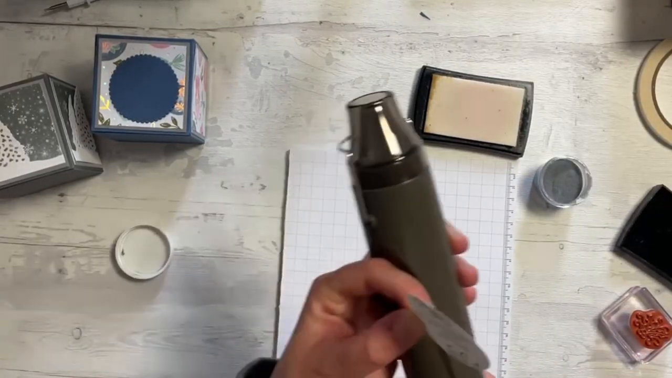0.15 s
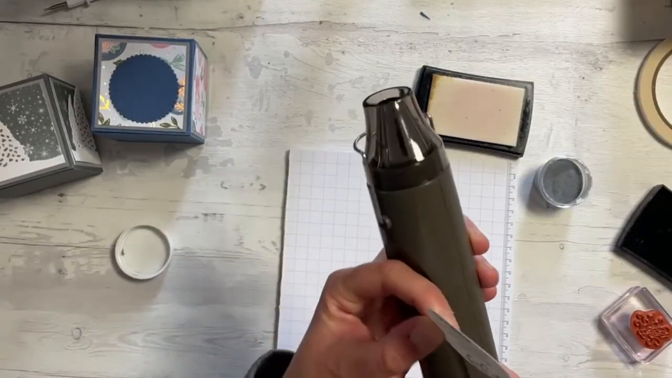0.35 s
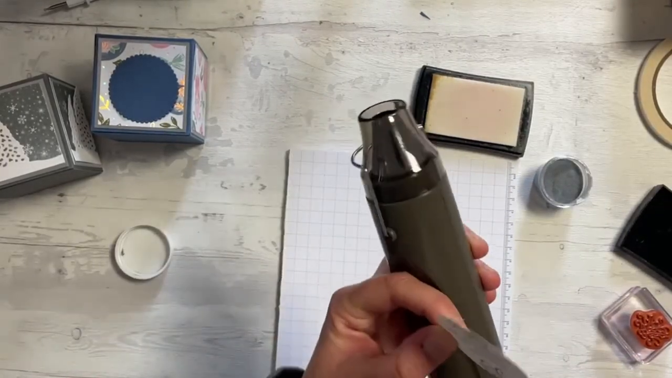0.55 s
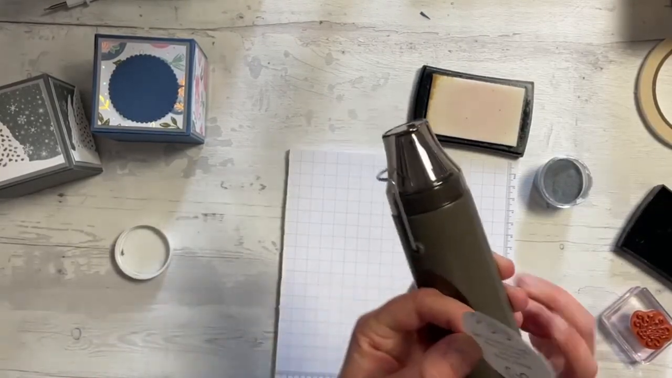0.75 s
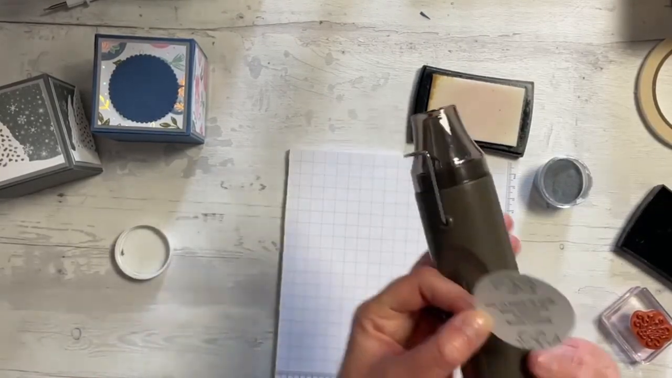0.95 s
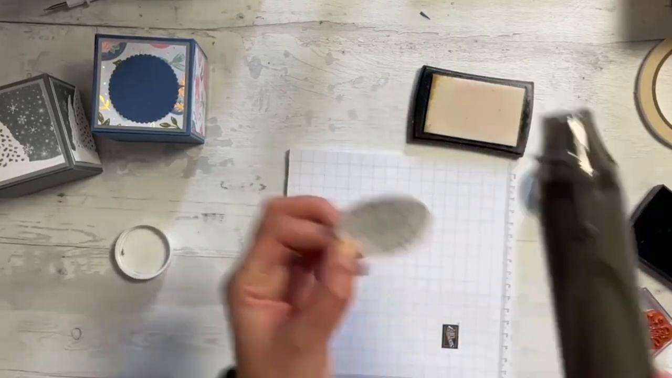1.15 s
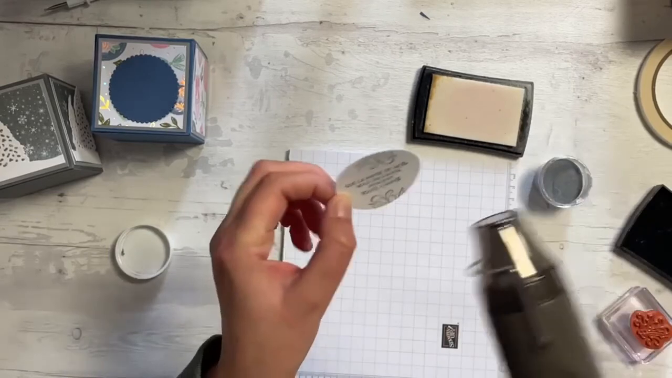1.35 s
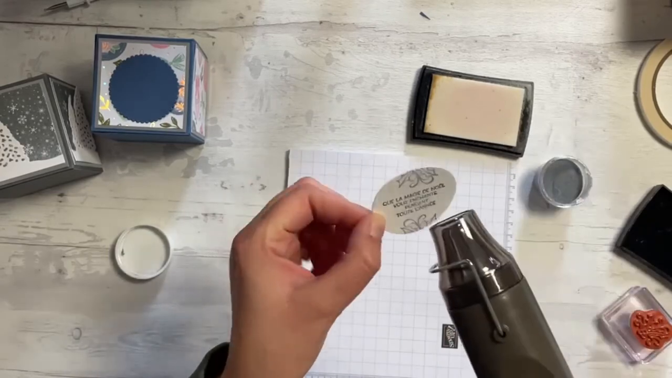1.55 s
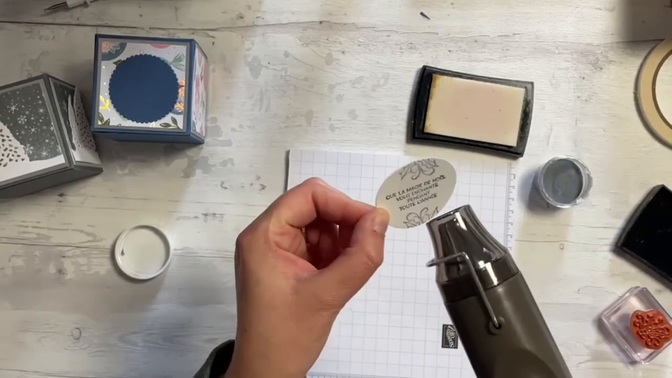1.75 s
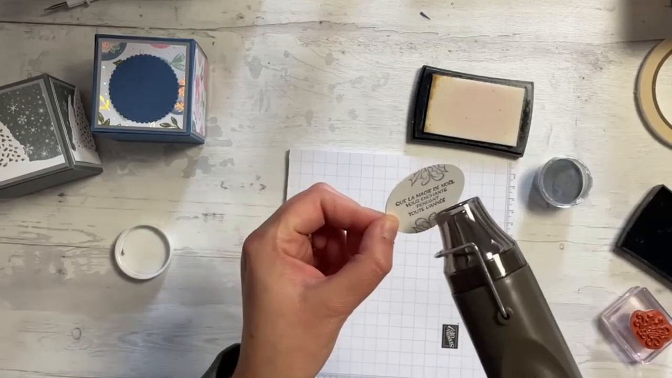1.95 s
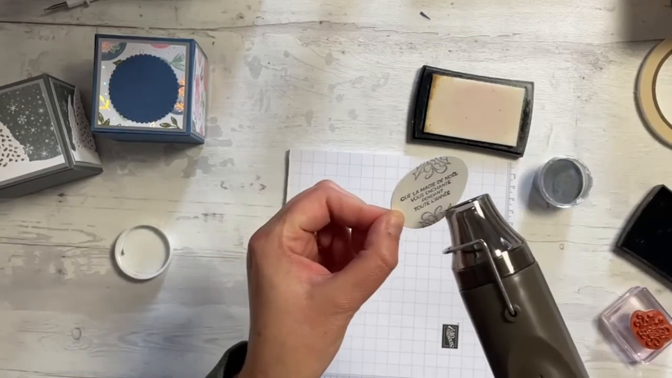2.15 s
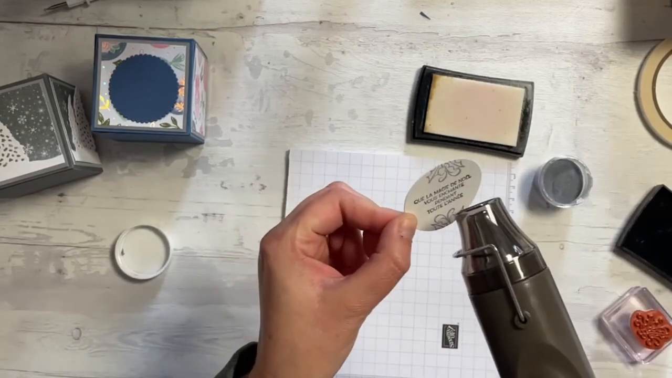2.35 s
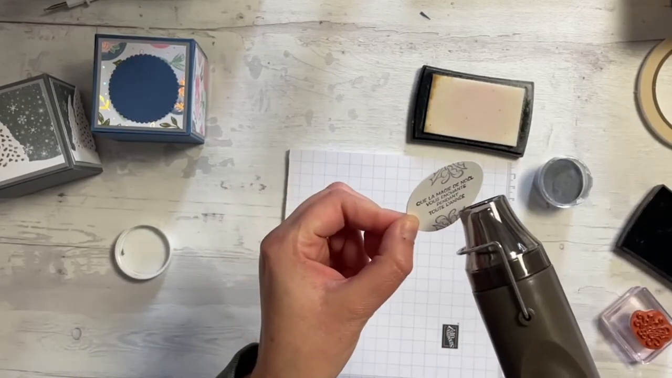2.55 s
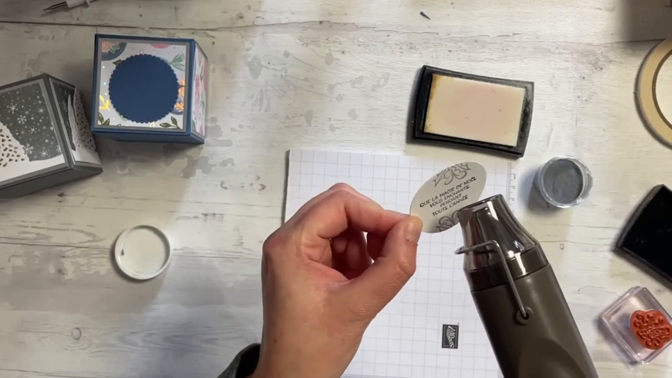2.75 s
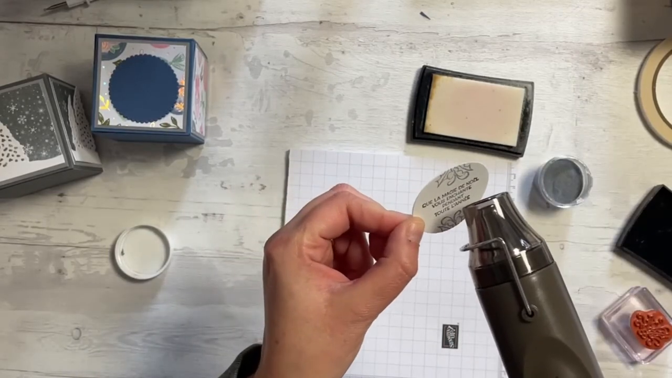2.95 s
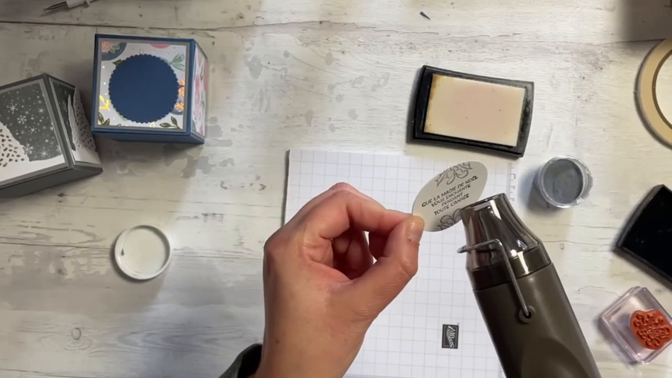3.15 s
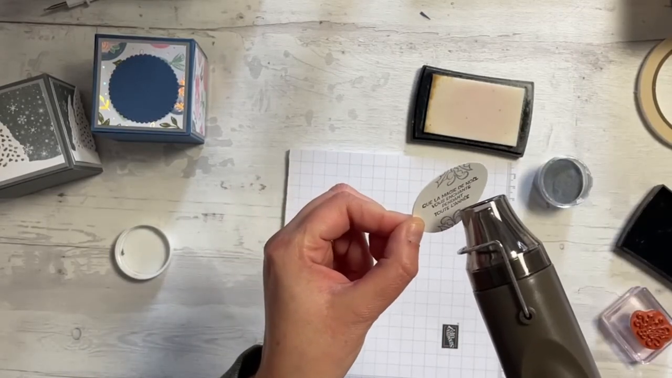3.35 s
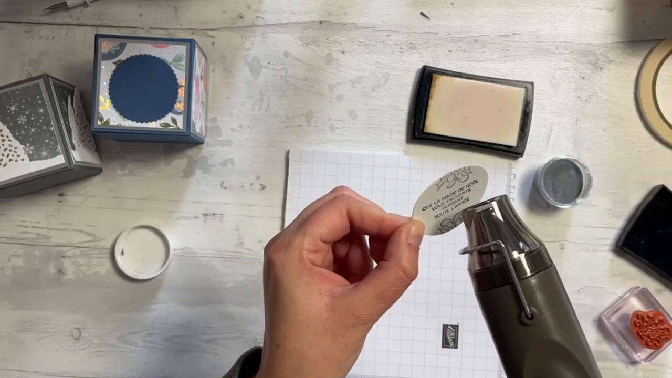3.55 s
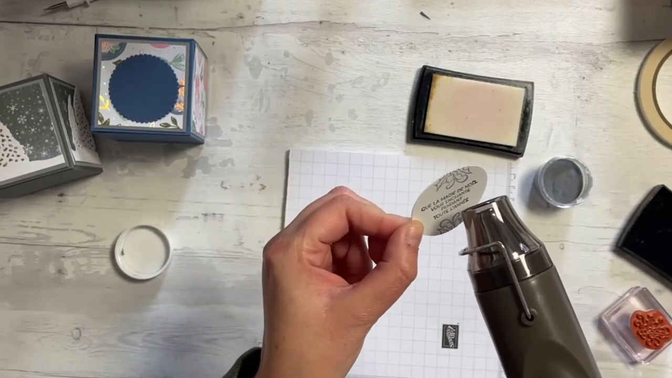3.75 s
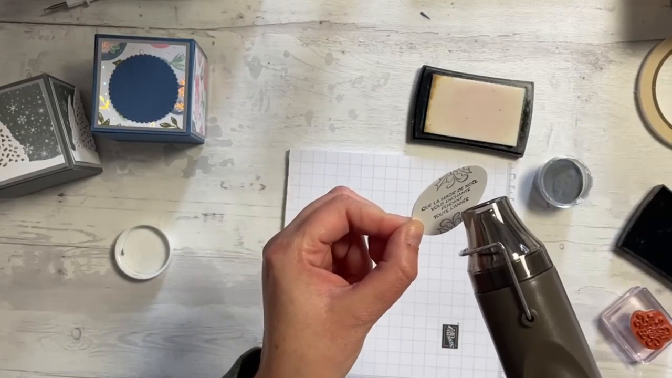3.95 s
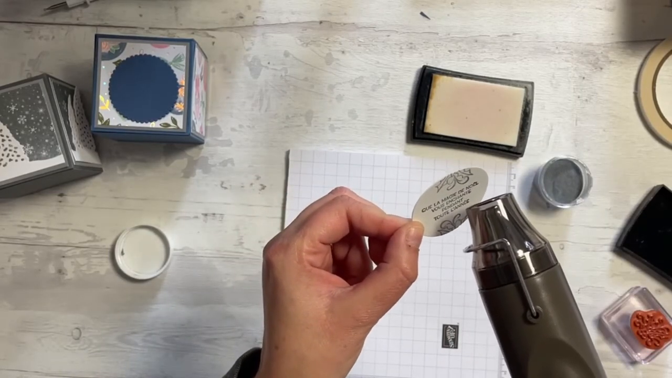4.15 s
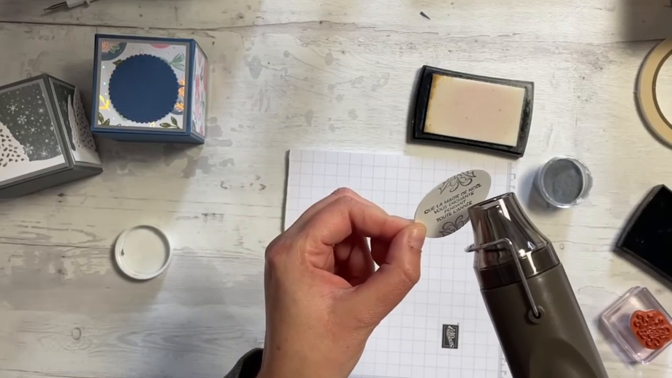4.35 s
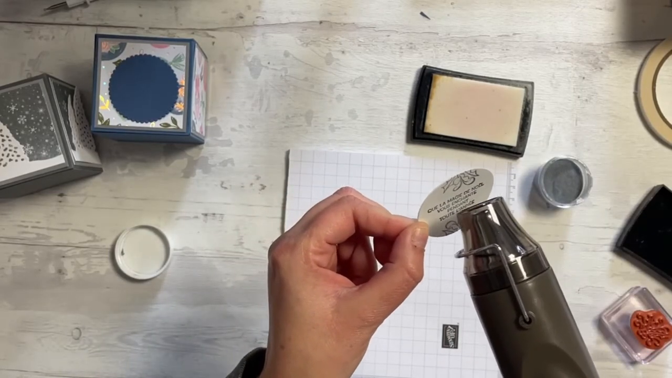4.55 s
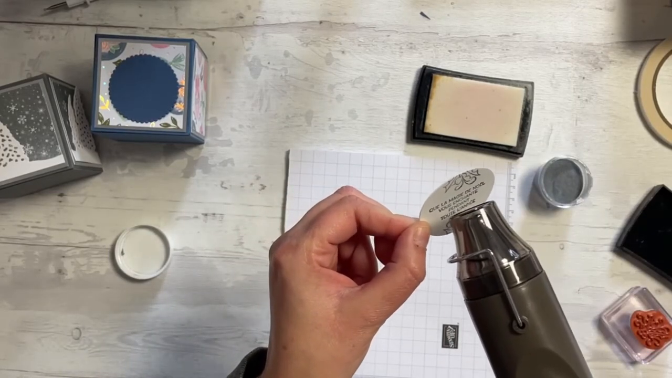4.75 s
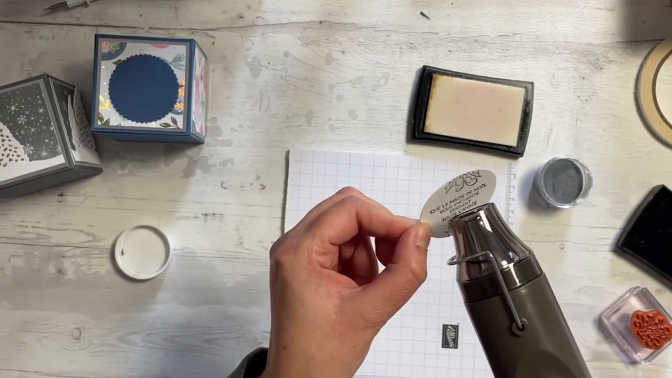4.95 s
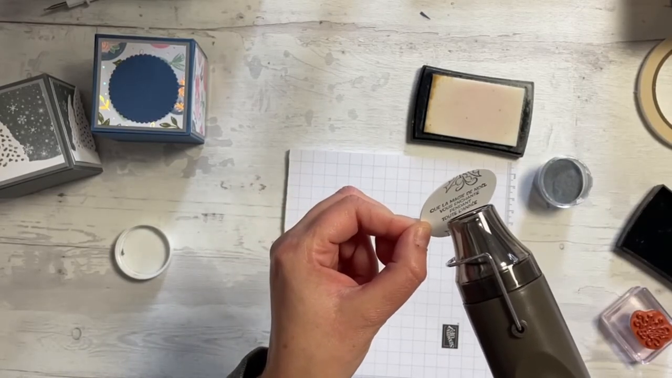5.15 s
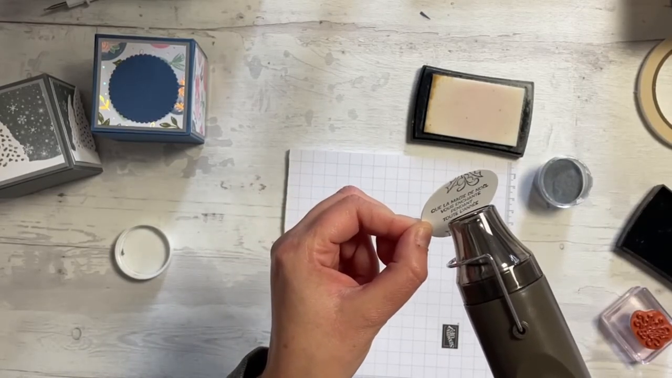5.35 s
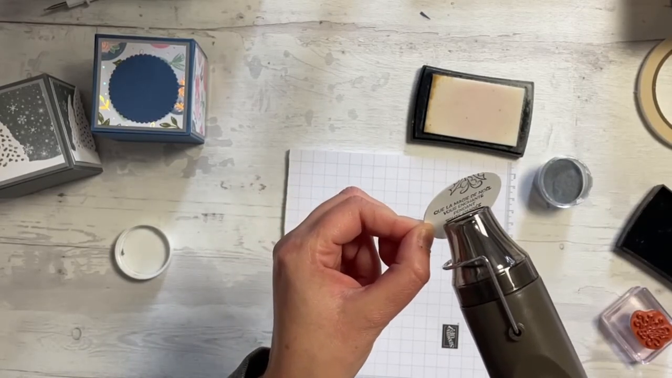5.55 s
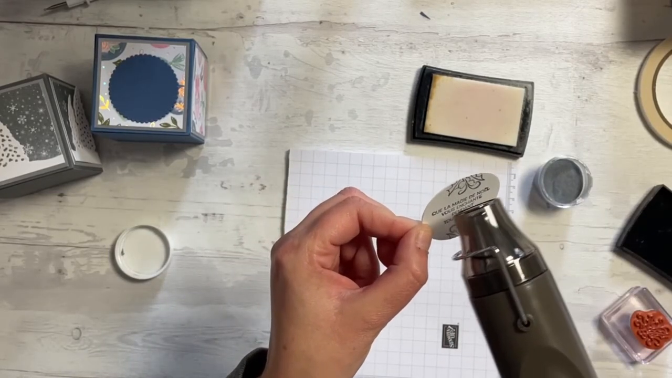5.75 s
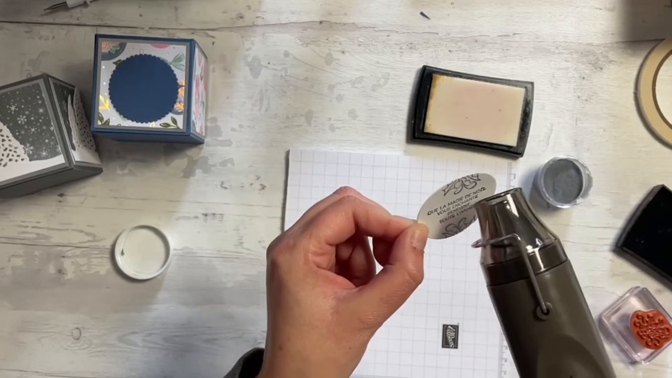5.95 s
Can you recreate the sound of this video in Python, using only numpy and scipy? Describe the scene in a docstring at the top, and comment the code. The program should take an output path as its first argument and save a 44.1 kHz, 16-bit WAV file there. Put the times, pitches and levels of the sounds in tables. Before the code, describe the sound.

A small, fairly dry room, heard close above a desk. The first 0.3 s is nearly silent, with a very faint rustle dying away at once. A soft tick comes at 0.3 s, then a bright, hard double plastic snap at 0.4 s with a short room reflection. A small heat gun motor immediately sweeps up in pitch, churning air, and settles near full speed by about 1 s. A low thump bumps the microphone at 0.7 s. The tones dip briefly around 1.15 s as the gun swings aside. Until 3.1 s it is loud: a broad airy rush with hiss, a strong fan whine, thin high tones and brush buzz, gently wavering. At 3.1 s the level drops abruptly, one high tone lingering briefly. The quieter whir holds, pitch dipping slightly then creeping up, with soft thumps near 5.0 and 5.6 s, still running at 6 s.

```python
"""In a small room, above a desk, a craft heat gun is switched on.
The switch ticks and snaps as short bursts of coloured noise with room reflections. The motor runs up to about
250 turns a second: its shaft angle drives a five-bladed fan's whine and a brush buzz over a rush of shaped noise.
The strongest tones swell and fade in the room as the speed wanders. Now and then low puffs and thumps of
air buffet the microphone. Halfway through, the gun's sound abruptly steps down."""
import sys
import numpy as np
from scipy import signal
from scipy.fft import rfft, irfft
from scipy.io import wavfile

SR = 44100
rng = np.random.default_rng(int(sys.argv[2]) if len(sys.argv) > 2 else 0)


def log_audio(samples):
    """Write samples as a 16-bit WAV file to the path given in sys.argv[1]."""
    # one column per channel
    frames = np.atleast_2d(samples).T
    # limit to full scale, then quantise
    limited = np.clip(frames, -1, 1)
    pcm = np.round(limited * 32767).astype(np.int16)
    wavfile.write(sys.argv[1], SR, pcm)


N = 269010
TIME = np.arange(N) / SR
FREQS = np.maximum(np.fft.rfftfreq(N, 1 / SR), 1)  # Hz, kept above 0 for the logarithms

# relative colour of the quiet room: pitch_hz, density_db (per Hz)
QUIET_COLOUR = [(35, -60), (60, -30), (120, -8), (207, -4), (324, -1), (363, -5), (465, -4.5), (1880, -8.5),
                (6330, -4), (13000, -15)]
# relative colour of the air puffs: pitch_hz, density_db (per Hz)
PUFF_COLOUR = [(25, -38), (55, -9), (90, 9), (140, 1), (200, -12), (400, -32), (1000, -70)]
# air puffs on the microphone: start_s (centre of the swell), level_db (before the low cut), half_length_s
AIR_PUFFS = [(0.741, -46, 0.022), (0.83, -78, 0.072), (1.917, -64, 0.025), (2.037, -67, 0.018),
             (2.54, -68, 0.026), (2.822, -71, 0.054), (4.78, -79, 0.063), (5.12, -62, 0.041),
             (5.28, -70, 0.054), (5.54, -64, 0.059), (5.653, -61, .025), (5.916, -68, 0.02)]
# sharp puffs that land as soft thumps: start_s, peak_db (of the swell), ring_hz
SOFT_THUMPS = [(0.708, -41, 126), (5.003, -43.5, 133), (5.527, -46, 140), (5.603, -39, 119),
               (5.632, -43, 130)]
# relative colour of the switch, before each contact's tilt: pitch_hz, density_db (per Hz)
SNAP_COLOUR = [(100, -52), (315, -27), (730, -22), (1150, -11), (1900, -1.5), (2800, -2), (4500, -0.5),
               (6800, -5), (8400, -3), (11400, -14.5), (13400, -34)]
# switch contacts: start_s, level_db (before envelope and low cut), decay_s, tilt_db (per octave), low_cut_hz
SWITCH_CONTACTS = [(0.309, -30.5, 0.0041, -6.5, 1120), (0.3968, -12, 0.0027, 1.5, 302),
                   (0.4075, -18, 0.0018, -4.5, 300)]
# the speed the motor heads for, wandering by about one percent: time_s, speed_turns_per_s
TOP_SPEED_CURVE = [(1, 246.6), (1.5, 248.15), (2.3, 248.8), (2.75, 249.45), (3.05, 249.55), (3.4, 249.2),
                   (3.75, 247.95), (4.5, 247.93), (4.75, 248.25), (5, 249.25), (5.75, 250.6), (6.08, 251)]
# relative broad colour of the rushing air: pitch_hz, density_db (per Hz)
AIR_COLOUR = [(60.0, -30), (150.0, -11.5), (200.0, -5.5), (470.0, -5.0), (540.0, 0), (1000.0, -2.7),
              (2900.0, 1.5), (3900.0, -13), (4800.0, -6), (6400.0, -13.5), (7400.0, -8), (10200.0, -16.5),
              (11500.0, -21.5), (12800.0, -40)]
# peaks and hollows that housing and desk add to that colour: pitch_hz, width_hz, gain_db
HOUSING_RESONANCES = [(234, 17, 5.5), (281, 8.9, 6), (522.3, 7.3, 14), (571, 23.3, 6.5), (654.3, 50, 14.5),
                      (789, 36, 11.5), (862.6, 13.5, 9.5), (927, 7.4, 14.5), (991, 12.3, 11.5),
                      (1119, 65, 7.5), (1282, 27, 7), (1357, 24, 6.5), (1484, 32, 7.5), (1650, 34, 7),
                      (1738, 24, 10), (1848, 29.7, 10.5), (1894, 11.5, 10), (1963, 52, 10), (2180, 30, -6),
                      (2304, 15, -12), (2200, 31, 0), (2606, 79, 8), (2785, 20, 6), (3463, 29, 6.5),
                      (5530, 73, 0), (8200, 170, -1.5), (8980, 46, 7)]
# loudness of the air while the gun is swung round and then held still: time_s, rush_db, hiss_db
AIM_CURVE = [(.8, 1.0, 1.5), (1.5, -.4, 1.5), (1.8, 0.6, -0.2), (2.3, -0.4, 0.0), (4.2, -0.3, -.5),
             (6, -0.7, 0.0)]
# extra tilt of the brush buzz, which is brighter than the air: pitch_hz, gain_db
BRUSH_COLOUR = [(4000, -8), (8000, -4), (12500, -14)]
# steady motor partials: multiple (of the turning rate), level_db (rms relative to the whine's own level)
SHAFT_PARTIALS = [(1, -51.5), (3, -48), (7, -47), (10, -45.5), (15, -57.5), (19, -53), (21, -60.5),
                  (22, -71), (25, -46.5), (27, -74), (28, -57), (29, -49), (31, -54), (32, -69), (37, -66),
                  (39, -67), (41, -54), (42, -70), (44, -60), (45, -58.5), (48, -68), (50, -75)]
# tones that swell and fade as the speed slides them across the room's peaks and nulls:
# multiple (of the turning rate), onset_turns_per_s, level_db (rms before the gains in standing_tones),
# trend_db_per_s (about mid-scene), loudest_at_turns_per_s (above full speed),
# spacing_turns_per_s (between peaks), reflected_share (0-1)
ROOM_TONES = [(5, 109.4, -44.5, -1.0, -0.39, 2.22, 0.72), (20, 231, -45, -0.9, 0.53, 3.8, 0.44),
              (30, 242, -47, -3.2, -0.3, 1.5, .44), (35, 252, -54, 3.9, 1.6, 3.5, 0),
              (36, 242, -54, -4, -1.4, 3.5, .31), (40, 249, -51, -2.5, -0.33, 2.9, 0.7)]

# quiet room, with a faint rustle dying away at first: levels in dB, fall in dB per s
QUIET_DB, RUSTLE_DB, RUSTLE_FALL_DB_PER_S = -77, -66.5, 138
# motor and fan; FULL_SPEED, in turns per s, is the reference for every speed ratio
START_S, RUN_UP_S, FULL_SPEED, BLADES = .36, .262, 249, 5
# base level of the rush, before aim, flutter and run-up
AIR_DB = -32.5
# early in the run-up the blade tone sweeps through the resonance of the nozzle
NOZZLE_HZ, NOZZLE_WIDTH_HZ, NOZZLE_DB = 620, 170, 6.5
# the gun is swung aside once and its strongest tones point away from the microphone
SWING_S, SWING_HALF_LENGTH_S, SWING_DB = 1.165, 0.07, -10
# the sound steps down, the bass a little less; the 5 kHz tone falls more slowly
STEP_S, STEP_FALL_S, BASS_STEP_DB, UPPER_STEP_DB = 3.098, .01, -10.5, -11
LINGERING_MULTIPLE, LINGER_S = 20, 0.22
CUTOFF_HZ = 13200


def from_db(db):
    """Decibels to gain."""
    return 10 ** (np.asarray(db) / 20)


def rms_one(x):
    """Scale to unit power."""
    return x / np.sqrt(np.mean(x ** 2) + 1e-20)


def in_time(rows):
    """Each column of a curve at every sample."""
    s, *columns = np.transpose(rows)
    return [np.interp(TIME, s, c) for c in columns]


def colour(points):
    """A short spectrum in dB, drawn out to every frequency on a log pitch scale."""
    hz, db = np.transpose(points)
    return np.interp(np.log(FREQS), np.log(hz), db)


def noise(spectrum_db):
    """Unit-power noise of the given colour."""
    spectrum = rfft(rng.standard_normal(N)) * from_db(spectrum_db)
    return rms_one(irfft(spectrum, N))


def drift(rate_hz):
    """Slow random wandering of spread 1, drawn at every 50th sample."""
    count = N // 50 + 2
    hz = np.fft.rfftfreq(count, 50 / SR)
    spectrum = rfft(rng.standard_normal(count)) / (1 + (hz / rate_hz) ** 2)
    slow = rms_one(irfft(spectrum, count))
    return np.interp(np.arange(N) / 50, np.arange(count), slow)


def butter(x, hz, kind, order=2):
    """Causal low- or high-pass."""
    return signal.sosfilt(signal.butter(order, hz, kind, fs=SR, output="sos"), x)


def quiet_room():
    """The room's own faint noise and the end of a rustle."""
    level = from_db(QUIET_DB) + from_db(RUSTLE_DB - RUSTLE_FALL_DB_PER_S * TIME)
    return level * noise(colour(QUIET_COLOUR))


def puffs(low_cut_hz=50):
    """Short swells of low rumble where the air stream meets the microphone."""
    swell = np.zeros(N)
    for start_s, level_db, half_length_s in AIR_PUFFS:
        swell += from_db(level_db) * np.exp(-.5 * ((TIME - start_s) / half_length_s) ** 2)
    return butter(swell * noise(colour(PUFF_COLOUR)), low_cut_hz, "high")


def thumps(swell_s=0.0067):
    """A sharp puff shakes the microphone for two or three low cycles."""
    out = np.zeros(N)
    for start_s, peak_db, ring_hz in SOFT_THUMPS:
        age = np.maximum(TIME - start_s, 0)
        swell = (age / swell_s * np.exp(1 - age / swell_s)) ** 3
        out += from_db(peak_db) * swell * np.sin(2 * np.pi * ring_hz * age)
    return out


def switch(rise_s=0.0011, pivot_hz=4000):
    """Each contact is a brief crack of the plastic shell, which is too small to radiate bass."""
    out = np.zeros(N)
    for start_s, level_db, decay_s, tilt_db, low_cut_hz in SWITCH_CONTACTS:
        age = np.maximum(TIME - start_s, 0)
        blow = (1 - np.exp(-(age / rise_s) ** 2)) * np.exp(-age / decay_s)
        crack = blow * noise(colour(SNAP_COLOUR) + tilt_db * np.log2(FREQS / pivot_hz))
        out += from_db(level_db) * butter(crack, low_cut_hz, "high", order=4)
    return out


def room(x, wet_db=-4.5, low_t60_s=0.24, high_t60_s=0.21, split_hz=3500, first_s=0.0053):
    """Dense reflections from desk and walls; the treble dies first."""
    scatter = rng.standard_normal(N) * (TIME > first_s)
    tail = butter(scatter, split_hz, "low", order=3) * from_db(-60 * TIME / low_t60_s)
    tail += butter(scatter, split_hz, "high", order=3) * from_db(-60 * TIME / high_t60_s)
    tail = tail / np.linalg.norm(tail)
    return x + from_db(wet_db) * signal.fftconvolve(x, tail)[:N]


def motor_speed(wobble=0.00034):
    """Turns per second: a quick rise that levels off as drag catches up with the motor."""
    since_start = np.maximum(TIME - START_S, 1 / SR)  # never quite still, so ratios stay above 0
    run_up = np.tanh(since_start / RUN_UP_S)
    return in_time(TOP_SPEED_CURVE)[0] * run_up * (1 + wobble * drift(5.4))


def build_up(speed, onset, sharpness, growth):
    """Gain of a sound that breaks out around an onset speed, then grows as a power of the speed."""
    opened = (1 + np.tanh(sharpness / 2 * np.log(speed / onset))) / 2
    return np.sqrt(opened) * (speed / FULL_SPEED) ** growth


def housing():
    """Gain in dB at every frequency for sound made inside the gun."""
    gain_db = colour(AIR_COLOUR)
    for hz, width_hz, db in HOUSING_RESONANCES:
        gain_db = gain_db + db * np.exp(-.5 * ((FREQS - hz) / width_hz) ** 2)
    return gain_db


def rush(angle, speed, bass_hz=380, split_hz=3400, low_cut_hz=95, bass_growth=1.5, flutter_db=.5):
    """Turbulence sounds through the housing; bass and hiss need more speed, and the hiss pulses once a turn."""
    air = butter(noise(housing()), low_cut_hz, "high", order=3)
    rush_db, hiss_db = in_time(AIM_CURVE)
    body = butter(air, split_hz, "low", order=7)
    bass = butter(body, bass_hz, "low", order=3) * (speed / FULL_SPEED) ** bass_growth
    body = butter(body, bass_hz, "high", order=3) + bass
    body = body * from_db(rush_db) * build_up(speed, onset=176, sharpness=7.8, growth=2.43)
    pulsing = 1 + .35 * np.cos(angle)
    hiss = butter(air, split_hz, "high", order=7) * pulsing
    hiss = hiss * from_db(hiss_db) * build_up(speed, onset=176, sharpness=22, growth=2.7)
    return (body + hiss) * from_db(AIR_DB + flutter_db * drift(19))


def swirl(angle, speed, level_db=-53.0, width_hz=70, rise_db=1.0):
    """Until the fan is up to speed its blades churn the air: blurred bands rise through the resonances."""
    bands = 0
    for k in range(1, 10):  # multiples of the blade rate; rise_db is per octave
        phase = k * BLADES * angle
        blurred = drift(width_hz) * np.cos(phase) + drift(width_hz) * np.sin(phase)
        bands += from_db(rise_db * np.log2(k)) * blurred
    housed = irfft(rfft(bands) * from_db(housing()), N)
    housed = butter(housed, 390, "high", order=3)
    slip = np.sqrt(np.clip(.99 - speed / FULL_SPEED, 0, 1))
    return from_db(level_db) * build_up(speed, onset=150, sharpness=4.2, growth=1.5) * slip * housed


def fraying(speed, most=0.78, reach=0.018):
    """Extra roughness of the tones for as long as the fan is short of 99 percent of full speed."""
    return most * np.tanh(np.maximum(.99 - speed / FULL_SPEED, 0) / reach)


def partial(angle, multiple, sway_db, rough, scatter=1.7):
    """One motor tone, loosely in step with the shaft; it sways, and uneven inflow frays it into a narrow skirt."""
    phase = multiple * angle + scatter * rng.standard_normal()
    tone = (1 + rough * drift(8.7)) * np.cos(phase) + rough * drift(22) * np.sin(phase)
    level = np.sqrt(.5 + rough ** 2)  # rms of the frayed tone
    return tone / level * from_db(sway_db * drift(0.87))


def brushes(angle, speed, level_db=-49.0, growth=4.2):
    """The commutator adds a faint buzz on all the high multiples, coloured by the housing."""
    buzz = sum(partial(angle, k, sway_db=3.5, rough=.1) for k in range(17, 53))
    buzz = irfft(rfft(buzz) * from_db(housing() + colour(BRUSH_COLOUR)), N)
    return from_db(level_db) * rms_one(buzz) * (speed / FULL_SPEED) ** growth


def whine(angle, speed, steady_db=-.5, growth=12.0):
    """Steady shaft partials, which only emerge near full speed."""
    rough = 0.12 + fraying(speed)
    steady = np.zeros(N)
    for multiple, level_db in SHAFT_PARTIALS:
        steady += from_db(level_db) * partial(angle, round(multiple), sway_db=2.0, rough=rough)
    return from_db(steady_db) * steady * (speed / FULL_SPEED) ** growth


def stepped(db, fall_s):
    """A gain that eases from 1 to a lower level from the moment of the step."""
    done = np.clip((TIME - STEP_S) / fall_s, 0, 1)
    return from_db(db * np.sin(np.pi / 2 * done) ** 2)


def step_down(x, split_hz=400):
    """The level falls abruptly and stays low."""
    bass = butter(x, split_hz, "low", order=3) * stepped(BASS_STEP_DB, STEP_FALL_S)
    upper = butter(x, split_hz, "high", order=3) * stepped(UPPER_STEP_DB, STEP_FALL_S)
    return bass + upper


def standing_tones(angle, speed, growth=1.1, sharpness=70, settling=12):
    """Each tone sets in at its own speed and meets its reflection once the pitch has nearly settled."""
    out = 0
    ratio = speed / FULL_SPEED
    rough = 0.11 + fraying(speed)
    swing_db = SWING_DB * np.exp(-.5 * ((TIME - SWING_S) / SWING_HALF_LENGTH_S) ** 2)
    for multiple, onset, level_db, trend_db, loudest_at, spacing, share in ROOM_TONES:
        k = round(multiple)
        # direct sound and reflection add or cancel as the speed moves
        turn = np.exp(2j * np.pi * (speed - FULL_SPEED - loudest_at) / spacing)
        reflection = share * np.minimum(ratio, 1) ** settling * turn
        nozzle_db = NOZZLE_DB / (1 + ((k * speed - NOZZLE_HZ) / NOZZLE_WIDTH_HZ) ** 2)
        gain = from_db(level_db + nozzle_db + swing_db + trend_db * (TIME - TIME.mean()))
        gain = gain * np.abs(1 + reflection) * build_up(speed, onset, sharpness, growth)
        fall_s = LINGER_S if k == LINGERING_MULTIPLE else STEP_FALL_S
        gain = gain * stepped(UPPER_STEP_DB, fall_s)
        out = out + gain * partial(angle, k, sway_db=.8, rough=rough)
    return out


def scene():
    """The quiet room, the puffs, the switch and the running gun."""
    background = quiet_room() + puffs() + thumps() + room(switch())
    speed = motor_speed()
    angle = 2 * np.pi * np.cumsum(speed) / SR  # shaft angle in radians
    air = rush(angle, speed) + swirl(angle, speed)
    motor = brushes(angle, speed) + whine(angle, speed)
    gun = step_down(air + motor) + standing_tones(angle, speed)
    return (background + gun)[None]


def record(dry):
    """A steep elliptic low-pass cuts the top."""
    return signal.sosfilt(signal.ellip(10, .2, 80, CUTOFF_HZ, fs=SR, output="sos"), dry)


dry = scene()
out = record(dry)
log_audio(out)
```